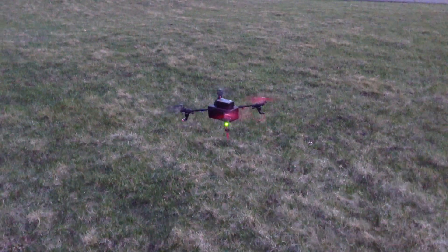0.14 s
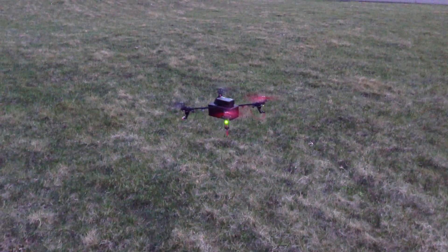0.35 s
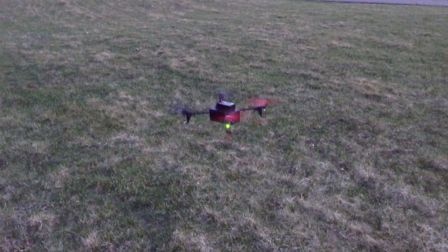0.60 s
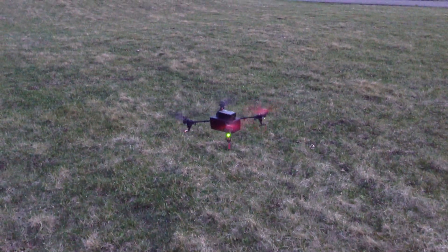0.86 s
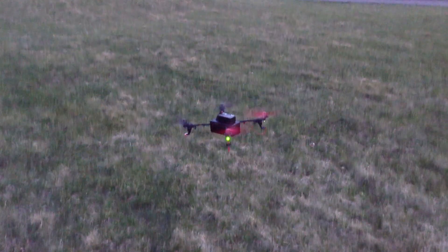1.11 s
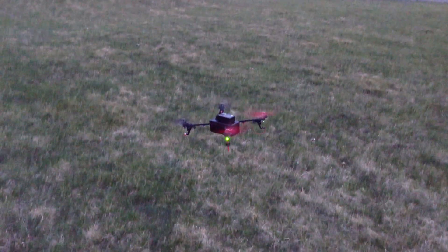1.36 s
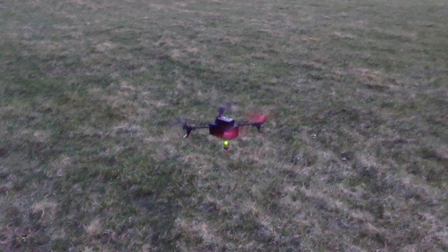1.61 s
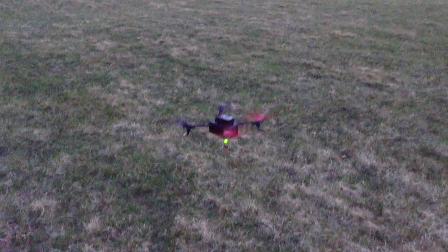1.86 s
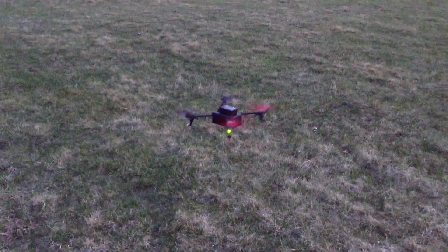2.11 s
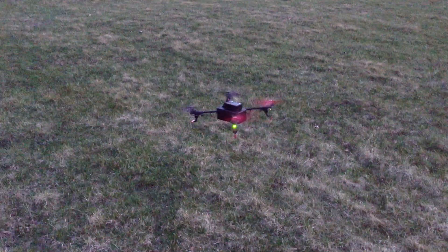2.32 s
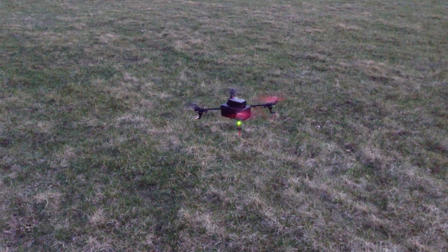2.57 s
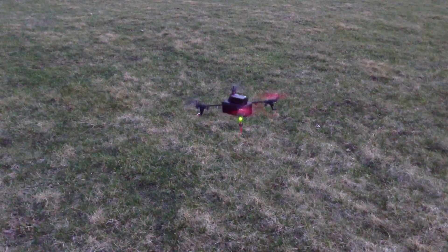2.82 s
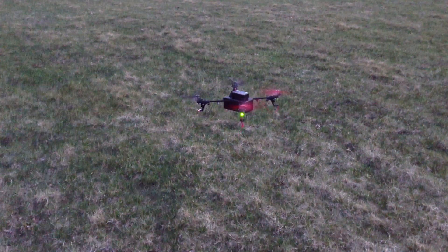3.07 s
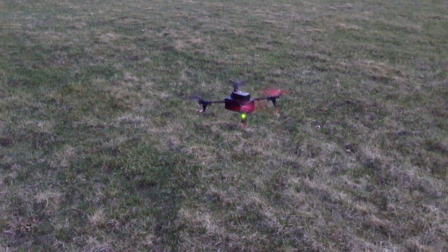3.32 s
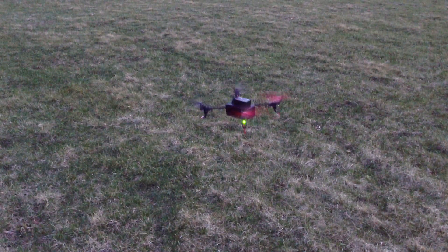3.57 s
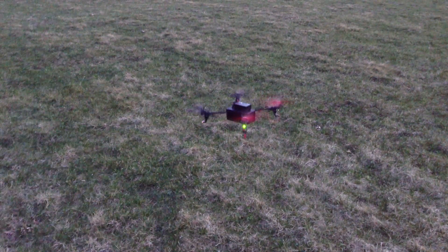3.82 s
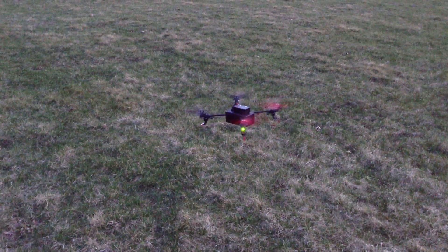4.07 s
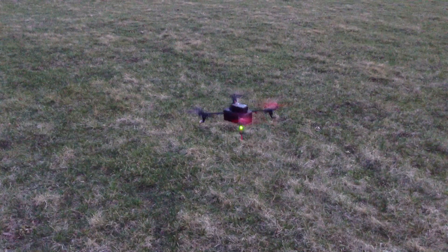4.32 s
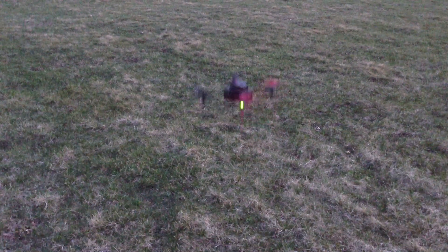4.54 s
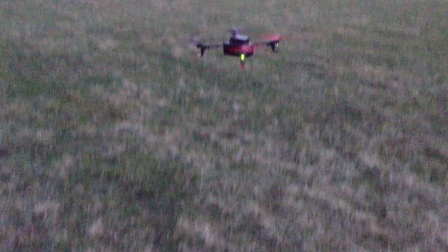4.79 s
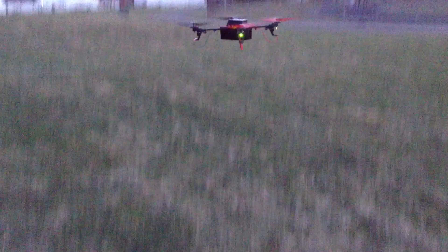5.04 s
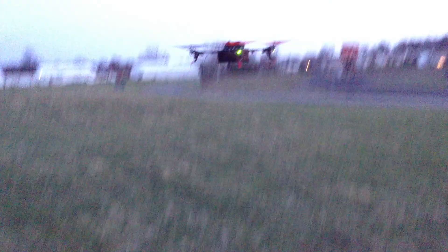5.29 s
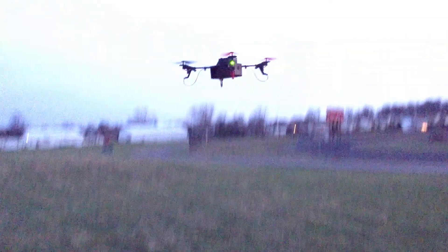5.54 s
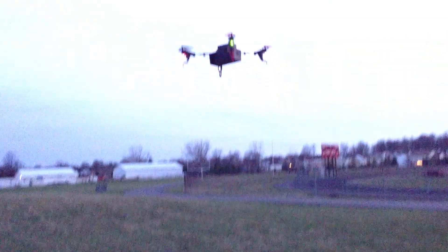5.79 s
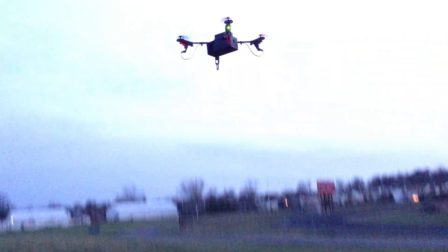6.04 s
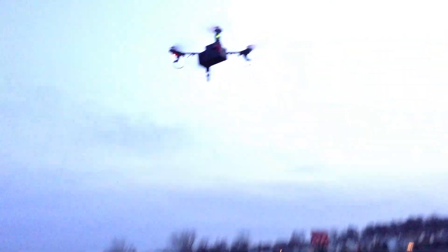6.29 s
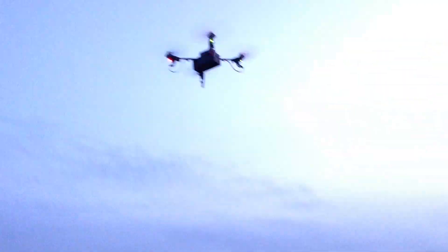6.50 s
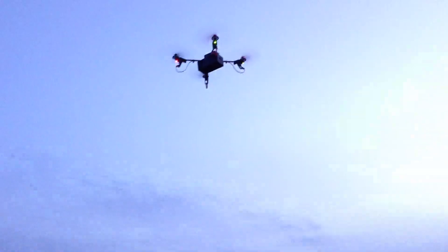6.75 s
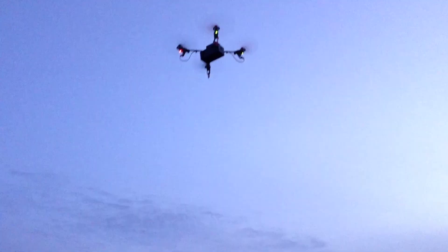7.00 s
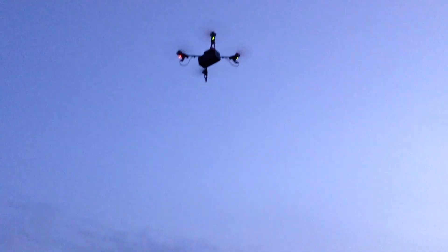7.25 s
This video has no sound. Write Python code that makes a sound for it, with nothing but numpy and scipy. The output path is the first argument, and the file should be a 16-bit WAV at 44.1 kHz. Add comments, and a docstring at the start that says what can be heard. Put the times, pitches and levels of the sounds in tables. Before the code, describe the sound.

Piercing electric whine and airy propeller hiss from a little drone hold unsteadily, jump up in pitch, throb briefly, then settle as it rises.

```python
"""A small geared quadcopter hovers over grass: four motors turn two-blade propellers through toothed wheels.
The teeth whine and rattle, the shafts hum and whistle, the blades growl and the air hisses, from sine tones
and shaped noise. The blade tones dip briefly early on. Later the motors surge, fall into step for a moment
and a high whistle swells. The craft climbs away, and the blend of two hiss colours shifts very slightly.
A faint outdoor rumble of low noise lies under it all."""
import sys
import numpy as np
from scipy import signal
from scipy.fft import rfft, irfft, next_fast_len
from scipy.io import wavfile
from scipy.ndimage import uniform_filter1d, map_coordinates

SR = 44100
rng = np.random.default_rng(int(sys.argv[2]) if len(sys.argv) > 2 else 0)


def wrap_up_sound(samples):
    """Save the sound to the file named by the first command line argument, as 16-bit audio."""
    columns = np.atleast_2d(samples).T
    # keep every value between -1 and 1, then stretch to whole-number steps
    tamed = np.clip(columns, -1, 1)
    steps = np.round(tamed * 32767).astype(np.int16)
    wavfile.write(sys.argv[1], SR, steps)


def field_ratio(decibels):
    """Amplitude ratio for a level in dB (20 dB per decade); scalars and array-likes work."""
    return 10 ** (np.asarray(decibels, dtype=float) / 20)


N = 325458  # length in samples
PINION_TEETH, WHEEL_TEETH = 8, 69

# how many teeth meet per second in each drive, before the quick hunting of the speed control:
# t/s, rotor 1 f/Hz, rotor 2 f/Hz, rotor 3 f/Hz, rotor 4 f/Hz
TOOTH_RATES = [(0, 4090, 4150, 3985, 4215), (.3, 3965, 4075, 3950, 4165), (.48, 3970, 4055, 3890, 4137),
               (.9, 4040, 4120, 3995, 4200), (1.18, 4105, 4270, 4070, 4330), (1.36, 3990, 4210, 4130, 4325),
               (1.78, 4105, 4375, 4200, 4425), (2.08, 4100, 4270, 4005, 4365),
               (2.5, 4095, 4160, 4040, 4335), (2.85, 4075, 4140, 4225, 4345), (3.1, 4000, 4092, 4185, 4320),
               (3.33, 4040, 4125, 3935, 4290), (3.6, 4060, 4234, 4125, 4305), (3.8, 3965, 4205, 4135, 4305),
               (4.1, 4035, 4255, 4196, 4350), (4.33, 4100, 4275, 4225, 4375),
               (4.42, 4620, 4720, 4530, 4620), (4.52, 4665, 4760, 4590, 4640),
               (4.72, 4650, 4700, 4570, 4610), (4.92, 4455, 4390, 4445, 4570),
               (5.08, 4385, 4290, 4335, 4250), (5.45, 4305, 4240, 4325, 4160),
               (5.8, 4350, 4215, 4265, 4063), (6.15, 4380, 4205, 4280, 4120), (6.5, 4335, 4180, 4260, 4108),
               (6.85, 4345, 4180, 4275, 4120), (7.05, 4360, 4135, 4290, 4090),
               (7.38, 4360, 4180, 4295, 4115)]
# slow changes of the layers:
# t/s, mid hiss gain/dB, half-rate whistle level/dB, hiss gain/dB, downwash gain/dB, rumble gain/dB
DRIFT = [(0, -1, -59, 1, 1, 0), (.55, 2, -66, -0.5, 1, -1.5), (.85, 1, -57.5, 0.5, 1.5, -1.5),
         (1.4, 2, -56, 0, 0, -2), (1.9, 1, -60, 0.5, 0, 1), (2.5, 1, -58, 0, -.5, -1),
         (3.0, 0.5, -56, 0, 1.5, 1.5), (3.4, 1, -60, -0.5, -.5, 1.5), (4.0, 0, -58, 0, -0.5, 1.5),
         (4.35, 2, -64, 0, 1.5, -2), (4.8, -.5, -68, 0.5, -1, -0.5), (5.2, -1, -67, 0.5, -0.5, 2),
         (5.6, 0.5, -61, 0, -1, -2), (6.0, -2, -62, 1.5, -.5, 3.5), (6.4, -1.5, -60, 1.5, -0.5, -.5),
         (6.9, -3.5, -62, 1, 1, 1.5), (7.38, -3, -61, -1, -1, -1)]


def unit(x):
    """Scales a sound to an average (rms) strength of 1."""
    return x / np.sqrt(np.mean(x ** 2) + 1e-20)


def curves(rows):
    """Draws straight lines through a table: one curve for each column after the time."""
    seconds, *columns = np.transpose(rows)
    return [np.interp(np.arange(N) / SR, seconds, column) for column in columns]


def wobble(rate):
    """A smooth random curve around zero, with `rate` random points per second."""
    points = rng.standard_normal(int(N * rate / SR) + 4)
    return map_coordinates(points, [np.arange(N) * rate / SR])


def swell_shape(start_s, rise_s, hold_s, fall_s):
    """Rises from 0 to 1, holds, and falls back to 0."""
    return np.interp(np.arange(N) / SR, np.cumsum([start_s, rise_s, hold_s, fall_s]), [0, 1, 1, 0])


def filtered(x, response):
    """Makes each frequency of x stronger or weaker, as response(hz) says."""
    size = next_fast_len(N + 8192)
    hz = np.fft.rfftfreq(size, 1 / SR)
    return irfft(rfft(x, size) * response(hz), size)[..., :N]


def coloured(x, spectrum):
    """Gives x the tone colour of a table of (f/Hz, level/dB), at rms 1."""
    f, db = np.transpose(spectrum)
    return unit(filtered(x, lambda hz: field_ratio(np.interp(np.log(hz + 1), np.log(f), db, -120))))


def patchy(depth_db):
    """White noise whose strength varies in random patches of time and pitch."""
    z = signal.stft(rng.standard_normal(N + 512), nperseg=512)[2]
    patches = uniform_filter1d(rng.standard_normal(z.shape), size=6, axis=0)
    patches = uniform_filter1d(patches, size=12, axis=1)
    return signal.istft(z * field_ratio(depth_db * unit(patches)), nperseg=512)[1][:N]


def tones(angle, orders, levels_db, flutter_db):
    """Sine tones at multiples of a shaft's turning, each fading in and out on its own."""
    total = 0
    for order, db in zip(orders, levels_db):
        loudness = field_ratio(db + flutter_db * wobble(9))
        total = total + loudness * np.sin(order * angle + rng.uniform(0, 2 * np.pi))
    return total


def flight():
    """How hard the motors surge (from their mean speed) and how far the craft has climbed, both 0-1."""
    surge_from_hz, surge_full_hz = 4390, 4625  # mean tooth rates
    lift_s, climb_s = 4.47, 1.26  # start and length of the climb out of the grass's reach
    mean_hz = np.mean(curves(TOOTH_RATES), axis=0)
    surge = np.clip((mean_hz - surge_from_hz) / (surge_full_hz - surge_from_hz), 0, 1)
    height = np.clip((np.arange(N) / SR - lift_s) / climb_s, 0, 1)
    return surge, height


def level(hover_db, surge_db, aloft_db):
    """A dB curve: its value in the hover, plus what the surge and the climb each add."""
    surge, height = flight()
    return hover_db + surge_db * surge + aloft_db * height


def craft():
    """Adds four drives and their air noise; the frame's resonances colour the pinion tones."""
    # each gear pair against the common level:
    # whine near grass level/dB, whine aloft level/dB, octave near grass level/dB, octave aloft level/dB
    gears = [(2, 3, 2, -5), (-2, -7, 2, 5), (1, -1, 1, -1), (-5, -7, -5, 1)]
    shafts = shaft_levels()
    third_db = level(-2.6, -3, -5.5)  # third whine line against the second
    drives = [rotor(hz, gear, shafts, third_db) for hz, gear in zip(curves(TOOTH_RATES), gears)]
    whine, pinions, blades, beats = np.sum(drives, axis=0)
    return whine + filtered(pinions, frame) + blades + blade_hiss(beats) + downwash()


def rotor(tooth_hz, gear, shafts, third_db):
    """One drive: the motor speed turns the teeth, and the teeth turn the pinion, wheel and blades."""
    blade_db, passing_db, rattle_change_db, pinion_db = shafts
    hunting_hz, swell_db = hunting()
    teeth = 2 * np.pi * np.cumsum(tooth_hz + hunting_hz) / SR  # angle: one turn per tooth
    wheel = teeth / WHEEL_TEETH + rng.uniform(0, 2 * np.pi)
    mesh = tooth_contact(teeth, wheel)
    whine_db, octave_db = gear_levels(tooth_hz, gear)
    lines_db = whine_db + swell_db, octave_db, octave_db + third_db
    whine = gear_whine(teeth, wheel, mesh, lines_db, rattle_change_db)
    pinion = pinion_sound(mesh, pinion_db)
    blades = blade_sound(wheel, blade_db, passing_db)
    # the pulse that the blades give the air
    beat = .07 * np.cos(wheel) + .11 * np.cos(2 * wheel) + .12 * np.cos(4 * wheel)
    return whine, pinion, blades, beat


def hunting():
    """The speed control hunts up and down: swing of the tooth rate (Hz) and swell of the whine (dB)."""
    throb_hz, peak_s = 14.2, 4.89  # swings per second, and a moment of top speed when in step
    lock = swell_shape(4.4, .45, .3, .65)  # the motors fall into step, then let go
    # each pair: running free, running in step
    swing_hz = 15 + (45 - 15) * lock
    depth = .26 + (.45 - .26) * lock  # swell at the fast end, 0-1
    drift = 2.6 + (.3 - 2.6) * lock  # scale of the random drift out of step, radians
    cycle = np.cos(2 * np.pi * throb_hz * (np.arange(N) / SR - peak_s) + drift * wobble(3))
    scatter_hz = 8 * wobble(30)
    swell_db = 20 * np.log10((1 + depth * cycle) / np.sqrt(1 + depth ** 2 / 2))
    return swing_hz * cycle + scatter_hz, swell_db


def tooth_contact(teeth, wheel):
    """Uneven parts and play between the teeth shake the moment at which they meet."""
    # uneven parts of the wheel: cycles per wheel turn, swing/radians
    wheel_error = [(1, .38), (2, .22), (4, .2)]
    mesh = teeth + .09 * wobble(300)  # play between the teeth
    for order, swing in wheel_error:
        mesh = mesh + swing * np.sin(order * wheel + rng.uniform(0, 2 * np.pi))
    return mesh


def gear_levels(tooth_hz, gear):
    """Whine and octave dB of one gear pair, which depend on speed, height and random swells."""
    # common level of the gear tones: t/s, whine level/dB, octave level/dB
    mesh_levels = [(0, -40.5, -38.5), (.5, -38.5, -37.5), (.8, -40, -37), (1.2, -39.5, -38),
                   (1.7, -41.5, -38.5), (2.3, -41.5, -39), (2.8, -39, -38.5), (3.3, -39, -39),
                   (3.8, -41.5, -39.5), (4.25, -37, -38.5), (4.45, -39, -38.5), (4.75, -42, -37),
                   (4.95, -34, -37.5), (5.3, -41, -40), (5.7, -45, -39), (6.3, -46, -35), (6.8, -44.5, -36),
                   (7.38, -46, -38)]
    housing_hz, housing_width_hz = 4030, 320  # the gear housing favours a whine near this pitch
    hover_hz, octave_db_per_khz = 4200, 16.5  # near the grass the octave grows with speed
    random_db, random_rate = 1.3, 15  # each gear tone swells and fades at random
    whine_db, octave_db = curves(mesh_levels)
    surge, height = flight()
    whine_low, whine_high, octave_low, octave_high = gear
    off_pitch_db = 10 * np.log10(1 + ((tooth_hz - housing_hz) / housing_width_hz) ** 4)
    whine_db = whine_db + whine_low + (whine_high - whine_low) * height
    whine_db = whine_db - (1 - height) * (1 - surge) * off_pitch_db
    octave_db = octave_db + octave_low + (octave_high - octave_low) * height
    octave_db = octave_db + (1 - height) * octave_db_per_khz * (tooth_hz - hover_hz) / 1000
    return whine_db + random_db * wobble(random_rate), octave_db + random_db * wobble(random_rate)


def gear_whine(teeth, wheel, mesh, lines_db, rattle_change_db):
    """Meeting teeth sing at one, two and three times their rate, with a band of rattle by each line."""
    # strength of the line, rattle against the line's level (dB), rattle speed (random points per second),
    # offset of the rattle's pitch as a share of the line's pitch
    lines = [(1.264, -4, 500, -0.00062), (1.01, -2, 1400, .04), (0.62, -3.0, 1300, -.012)]
    whine = 0
    for k, (db, (strength, rattle_db, rattle_rate, lean)) in enumerate(zip(lines_db, lines), start=1):
        flutter_db = 1.8 * wobble(28)  # each line flutters at random
        out_of_true = 1 + .4 * wobble(12) * np.cos(wheel)  # the wheel runs out of true
        line = strength * field_ratio(flutter_db) * out_of_true * np.sin(k * mesh)
        rattle = field_ratio(rattle_db + rattle_change_db) * wobble(rattle_rate) * np.sin(k * (1 + lean) * teeth)
        whine = whine + field_ratio(db) * (line + rattle)
    return whine


def shaft_levels():
    """Level curves that all four drives share: blades, passing tone, rattle and pinion tones, in dB."""
    blade_db = level(-60.5, 10.1, 2.3)
    blade_db = blade_db - 7 * swell_shape(1, 0.4, .02, .05)  # the blade tones dip briefly
    passing_db = level(-63, 2, -4)  # the tone at twice the blade rate
    rattle_change_db = level(0, -5, -1.5)  # the teeth rattle less in the surge and aloft
    hum_db = level(-58.5, 8, 0.8)
    half_rate_db = curves(DRIFT)[1]
    beside_db = level(-55, 0, -4) + 2.5 * wobble(10)  # the whistles beside the whine come and go
    high_db = -66 + (-46 + 66) * swell_shape(4.76, .36, .6, .25)  # the high whistle swells once
    return blade_db, passing_db, rattle_change_db, [hum_db, half_rate_db, beside_db, high_db]


def pinion_sound(mesh, pinion_db):
    """The small wheel's shaft hums and whistles at whole multiples of its turning."""
    # hum, half-rate whistle, whistles beside the whine and its octave, high whistle: cycles per pinion turn
    pinion_orders = [
        [1, 2],
        [4],
        [7, 9, 15, 17],
        [11],
    ]
    # one list per group above, added to the group's level: level/dB of each tone
    pinion_tones = [
        [2.1, 0],
        [2.8],
        [13, 6, 9, 7],
        [8.8],
    ]
    total = 0
    for db, orders, levels_db in zip(pinion_db, pinion_orders, pinion_tones):
        total = total + field_ratio(db) * tones(mesh / PINION_TEETH, orders, levels_db, flutter_db=1.0)
    return total


def blade_sound(wheel, blade_db, passing_db):
    """The blades turn with the big wheel and growl at multiples of its turning."""
    # tones under the whine: cycles per wheel turn
    blade_orders = [2, 6, 7, 9, 10, 12, 13]
    # one for each tone above, added to the blades' level: level/dB
    blade_tones = [-18, -12, -5, 0, -11, -6, -5]
    growl = field_ratio(blade_db) * tones(wheel, blade_orders, blade_tones, flutter_db=2.5)
    return growl + tones(4 * wheel, [1], [passing_db], flutter_db=2.5)


def frame(hz):
    """Arms and motor mounts ring at their own pitches: summed resonances with alternating signs."""
    # resonances of the frame: f/Hz, width/Hz, level/dB
    resonances = [(607, 175, 1.5), (1200, 850, -8), (2040, 68, 3), (4010, 69, -2), (6040, 380, -7),
                  (8000, 5200, -2)]
    total = 0
    for k, (centre, width, db) in enumerate(resonances):
        ring = 1j * hz * width / (centre * centre - hz * hz + 1j * hz * width)
        total = total + (-1) ** k * field_ratio(db) * ring
    return total


def blade_hiss(beats):
    """Air noise that pulses as the blades pass the arms: two hiss colours, blended almost equally."""
    # first hiss colour: f/Hz, level per Hz/dB
    first_colour = [(900, -51), (1600, -13.5), (2500, -7), (3500, -4), (5000, -1.5), (6200, -12.5),
                    (8000, -1.5), (10000, -1), (11400, -1), (12400, -8), (13400, -26), (15000, -1.5),
                    (16000, -22)]
    # second hiss colour: f/Hz, level per Hz/dB
    second_colour = [(900, -49), (1600, -23.5), (2500, -8.5), (3500, -10.5), (5000, -13.5), (6200, -0.5),
                     (8000, -1.5), (10000, 1.5), (11400, -13), (12600, -3), (13600, 2), (15000, -21),
                     (16000, -20)]
    mid_db, _, hiss_db, _, _ = curves(DRIFT)
    air = (1 + beats) * patchy(depth_db=0.7)
    share = 0.41 + (0.49 - 0.41) * flight()[1]  # slightly more of the second colour after the climb
    hiss = (1 - share) * coloured(air, first_colour) + share * coloured(air, second_colour)
    below_treble = filtered(hiss, lambda hz: 1 / (1 + (hz / 4500) ** 6))
    hiss = hiss + (field_ratio(mid_db) - 1) * below_treble  # the mid band's own level
    return field_ratio(level(-32, 0.9, 0) + hiss_db) * hiss


def downwash():
    """The air pushed down by the blades: a rush of patchy, lower noise whose level rises and falls a little."""
    # colour of the downwash: f/Hz, level per Hz/dB
    wash_colour = [(200, -14), (310, -10), (500, -2), (650, -2.5), (900, -1), (1200, -5.5), (1700, -11),
                   (2400, -18)]
    wash_db = curves(DRIFT)[3]
    return field_ratio(level(-43.5, 0, -0.32) + wash_db) * coloured(patchy(depth_db=1.5), wash_colour)


def field():
    """The low outdoor rumble: deep noise whose level sways slowly."""
    # colour of the rumble: f/Hz, level per Hz/dB
    rumble_colour = [(15, -34), (50, -28), (80, -11), (120, 0), (200, 4), (260, -3.5), (330, -11),
                     (450, -36)]
    rumble_db = -55 + curves(DRIFT)[4]
    return field_ratio(rumble_db) * coloured(patchy(depth_db=0.5), rumble_colour)


def scene():
    """The craft over the field, heard by one microphone."""
    return (craft() + field())[None]


def roll_off(x):
    """The treble ends steeply here."""
    return signal.sosfilt(signal.butter(12, 16510, fs=SR, output="sos"), x)


def record(dry):
    """Cuts off everything from 15330 Hz up."""
    mix = filtered(dry, lambda hz: hz < 15330)
    return roll_off(mix)


dry = scene()
out = record(dry)
wrap_up_sound(out)
```